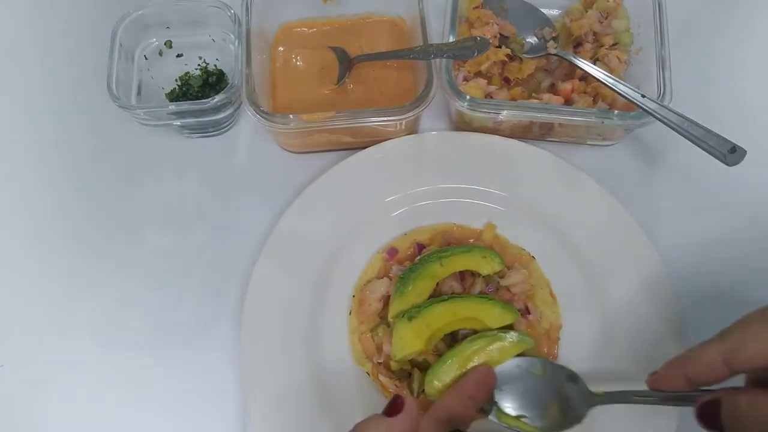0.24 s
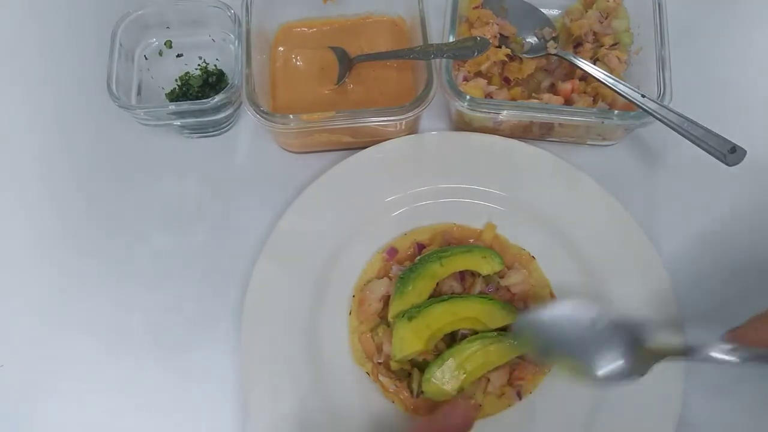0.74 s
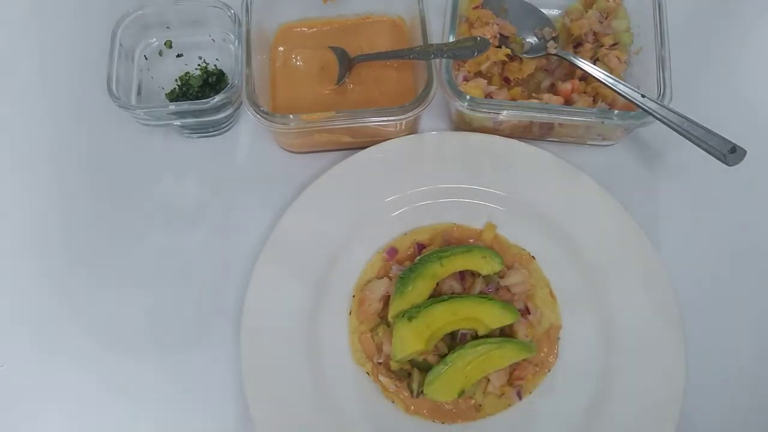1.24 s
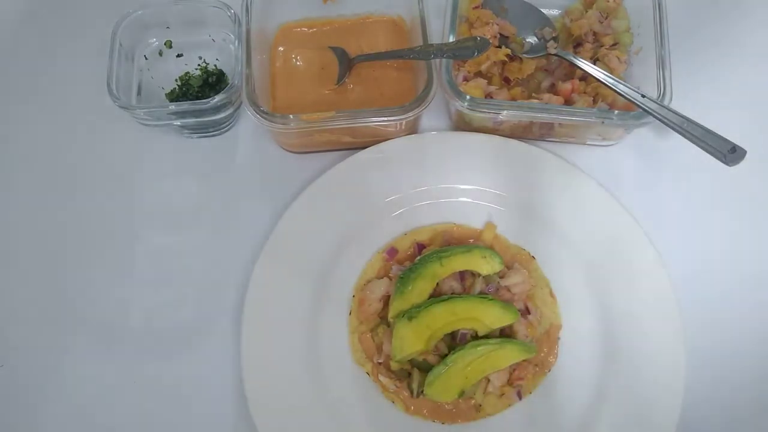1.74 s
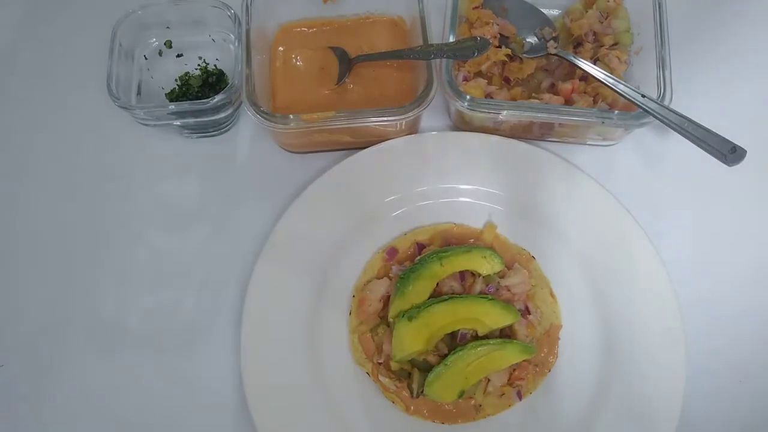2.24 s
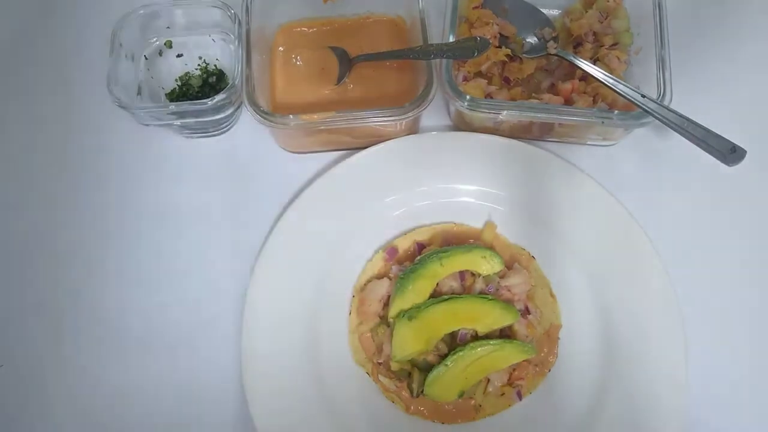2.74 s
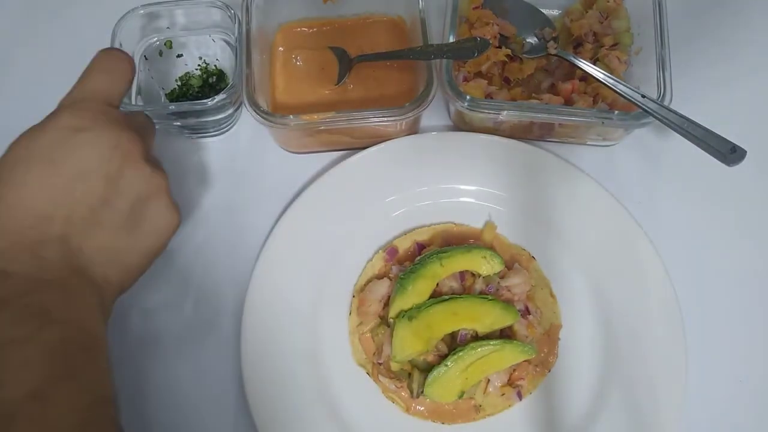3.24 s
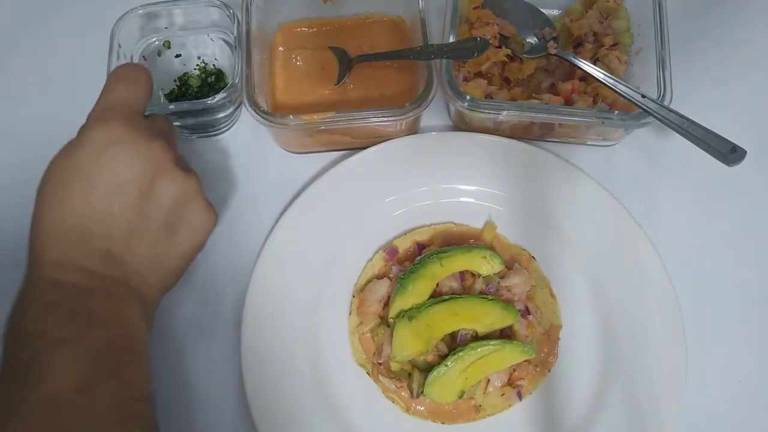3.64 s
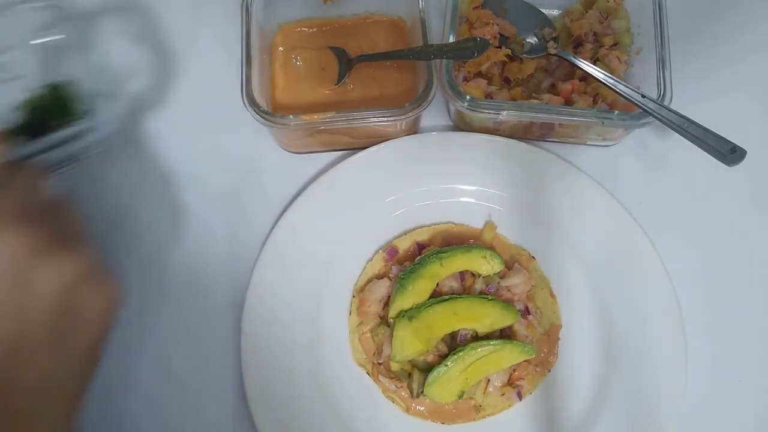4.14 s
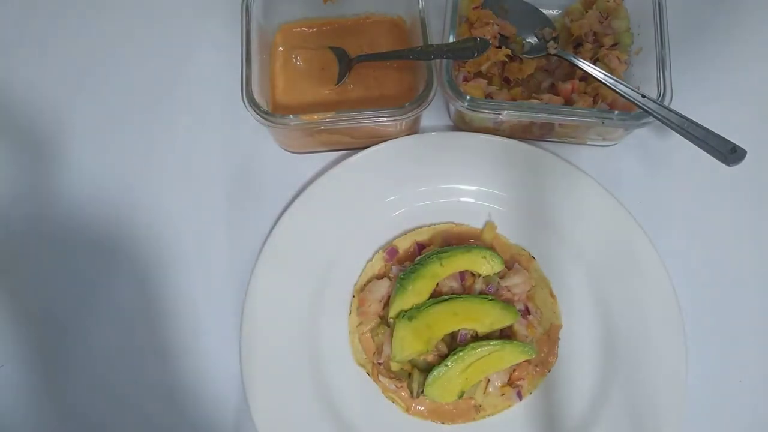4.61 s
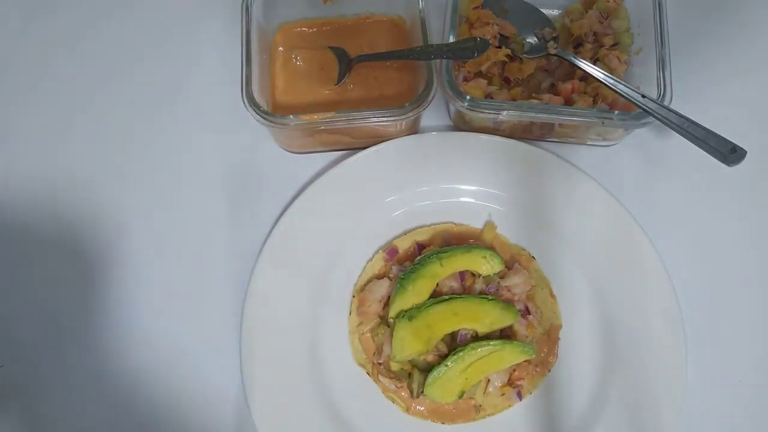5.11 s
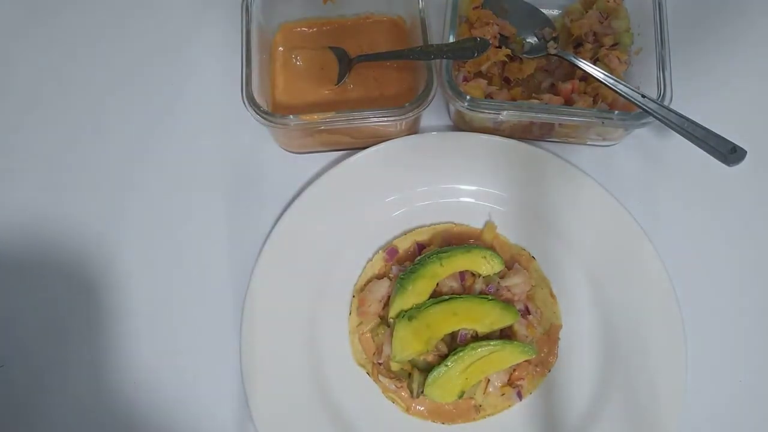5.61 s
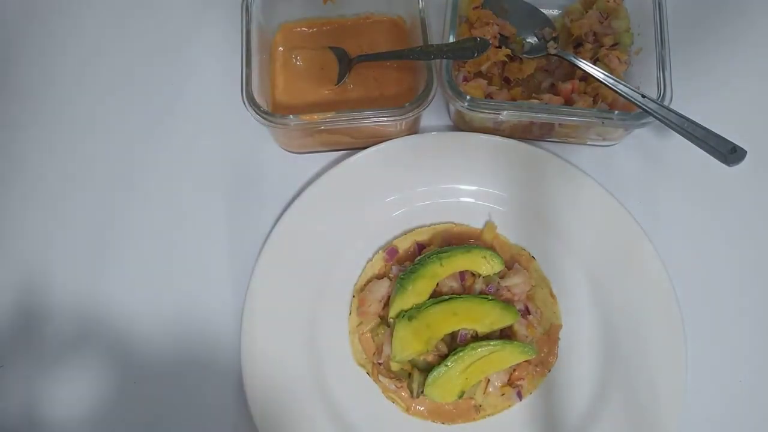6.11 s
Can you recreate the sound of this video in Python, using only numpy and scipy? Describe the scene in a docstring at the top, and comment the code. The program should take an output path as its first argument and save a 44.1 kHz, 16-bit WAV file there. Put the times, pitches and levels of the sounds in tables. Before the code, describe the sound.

A phone close above a kitchen table picks up steady fridge hum and barely audible hand rustle. After a short hoarse squeak, a solid dish bangs down with a clattering knock, rubs along, then knocks even harder. Softer woody bumps follow, then a calm gap, a small glass dish dragging to a stop and one bright, thin clink of a spoon. Short, lively room ring.

```python
"""A quiet kitchen, heard by a phone above the table: a fridge hums, sleeves and fingers rustle, something solid
slides with a short squeak, then knocks hard twice on the worktop, a glass dish drags softly and a spoon clinks.
Hum and rustle are shaped noise and tones; blows are pushes and noise bursts that ring resonances.
The phone steers its two microphones left and right by delaying one and subtracting it from the other.
Levels are set at the microphones, ahead of that steering."""
import sys
import numpy as np
from scipy import signal
from scipy.fft import rfft, irfft, next_fast_len
from scipy.io import wavfile
from scipy.ndimage import map_coordinates

SR = 44100
rng = np.random.default_rng(int(sys.argv[2]) if len(sys.argv) > 2 else 0)


def transcribe(signal):
    """Save signal, clipped to [-1, 1], as a 16-bit WAV file at the path in sys.argv[1]."""
    frames = np.atleast_2d(signal).T
    limited = np.clip(frames, -1, 1)
    pcm = np.round(limited * 32767).astype(np.int16)
    wavfile.write(sys.argv[1], SR, pcm)


N = 280476


def amp(db):
    """dB to gain."""
    return 10 ** (np.asarray(db) / 20)


def unit(x):
    """Scaled to rms 1."""
    return x / np.sqrt(np.mean(x ** 2) + 1e-20)


def along(points, hz):
    """Columns of (Hz, value, ..) points, read along a log frequency axis."""
    f, *columns = np.transpose(points)
    return np.squeeze([np.interp(np.log(hz + 1), np.log(f + 1), values) for values in columns])


def curves(rows):
    """One value per sample for each column after the time."""
    s, *columns = np.transpose(rows)
    return [np.interp(np.arange(N) / SR, s, values) for values in columns]


def wobble(rate):
    """A smooth random curve with rate knots a second."""
    knots = rng.standard_normal(int(N * rate / SR) + 4)
    return map_coordinates(knots, [np.arange(N) * rate / SR])


def filtered(x, response):
    """x passed through a complex response of frequency."""
    n = x.shape[-1]
    m = next_fast_len(n + 8192)
    return irfft(rfft(x, m) * response(np.fft.rfftfreq(m, 1 / SR)), m)[..., :n]


def resonances(modes):
    """Causal sum of (Hz, width Hz, dB) resonances, all starting the same way."""
    return lambda f: sum(amp(db) * 1j * f * width / (hz * hz - f * f + 1j * f * width)
                         for hz, width, db in modes)


SPACING_S = 21.4 / 44100  # sound's travel time between the microphones


def likeness(hz):
    """How alike the two spaced microphones hear sound that comes from all sides."""
    return np.sinc(2 * hz * SPACING_S)


def diffuse(size, gain=np.ones_like):
    """Noise from all sides at the two microphones, rms 1: low frequencies are shared, high ones hardly."""
    mid_side = lambda hz: gain(hz) * np.sqrt([1 + likeness(hz), 1 - likeness(hz)])
    mid, side = filtered(rng.standard_normal((2, size)), mid_side)
    return unit(np.array([mid + side, mid - side]))


# How long the kitchen rings. Each row: frequency in Hz, time to fall 60 dB in seconds.
KITCHEN = [(100, 0.54), (400, 0.43), (1500, 0.65), (4000, 0.62), (12000, 0.19)]


def room(x):
    """A new reverberant tail for one short sound; each frequency dies at its own speed."""
    hz, t, z = signal.stft(diffuse(SR // 2), SR, nperseg=256)
    decay = amp(-60 * t / along(KITCHEN, hz)[:, None])
    tail = signal.istft(z * decay, SR, nperseg=256)[1][:, :SR // 2]
    tail = tail * (1 - np.exp(-np.arange(SR // 2) / SR / 0.00025))
    return signal.fftconvolve(x[None], tail / np.linalg.norm(tail[0]), axes=1)


def placed(x, s, wet_db, lag_ms, pan_db):
    """A short sound at s seconds: direct, later by lag_ms and louder by pan_db at the left, plus the room."""
    wet = amp(wet_db) * room(x)
    delay_s = np.array([[lag_ms / 1000], [0]])
    direct = filtered(np.pad(x, (0, SR // 2 - 1)), lambda hz: np.exp(-2j * np.pi * hz * delay_s))
    both = direct * amp([[pan_db / 2], [-pan_db / 2]]) + wet
    return np.pad(both, ((0, 0), (round(s * SR), N)))[:, :N]


# Room tone of air and fridge together. Each row: time in seconds, level in dB.
ROOM_TONE = [(0.0, -60.5), (2.32, -60.5), (2.62, -56.5), (2.92, -52.5), (3.08, -50.5), (3.4, -56.5),
             (3.58, -54.5), (3.75, -54.5), (4.04, -54.5), (4.64, -56), (5.69, -55), (6.0, -58), (6.36, -55)]
# Colour of the room air. Each row: frequency in Hz, relative density in dB per Hz.
AIR = [(25, -38), (60, -4.5), (110, -22), (200, 2.5), (400, -3.5), (800, -14), (2000, -18.5), (4000, -26),
       (8000, -31), (14000, -34.5)]
# Fuzzy bands of the compressor. Each row: centre in Hz, width in Hz, level in dB over the room tone.
DRONE = [(121.6, 9.7, -6.5), (175.3, 20.6, -4), (247.3, 10.9, -4.5), (375.4, 32, -12.5)]
# Fridge tones. Each row: pitch in Hz, mean level in dB over the opening room tone,
# dB lost against the room tone for each dB that it swells.
WHINE = [(592.4, -12, -0.53), (767, -9.5, 0.4), (1048, -26, 1.5), (2693, -20, 0.3)]


def fridge():
    """Room air, the fuzzy drone of the compressor and a few slightly wavering tones."""
    level_db, = curves(ROOM_TONE)
    t = np.arange(N) / SR
    sound = amp(-2) * diffuse(N, lambda hz: amp(along(AIR, hz)))
    for hz, width, db in DRONE:
        sound += amp(db) * diffuse(N, lambda f: np.exp(-((f - hz) / width) ** 2))
    for hz, db, steady in WHINE:
        gain = amp(db + wobble(3.63) - steady * (level_db - level_db[0]))
        # the tones reach the microphones a quarter turn apart
        phase = 2 * np.pi * hz * t + 0.4 * wobble(4.9) + np.array([[0], [np.pi / 2]])
        sound += gain * np.sin(phase)
    return amp(level_db) * sound


# Hiss of the sleeves. Each row: frequency in Hz, relative density in dB per Hz.
CLOTH = [(1500, -2), (4000, 8.5), (7000, 4), (11000, 5), (14500, -5)]
# Rubbing on the worktop, without the dish's resonances. Each row: frequency in Hz, relative density in dB per Hz.
RUBBING = [(300, -45), (600, 17.5), (1000, 20.5), (2000, 8.5), (3300, 4), (5500, -26), (8000, -51),
           (12000, -61)]
# Resonances of the worktop. Each row: pitch in Hz, width in Hz, relative level in dB.
WORKTOP = [(194.6, 29.5, 7.5), (382.5, 118, 1.5), (471.3, 65, 2), (605, 117, -1), (745, 190, -4),
           (906, 60, 0), (972, 56, 1), (1067, 90, 0), (1212, 63, 0), (1387, 47, 5), (1722, 100, 11),
           (1925, 290, 12)]
# Resonances of the solid dish that knocks. Each row: pitch in Hz, width in Hz, relative level in dB.
DISH = [(944, 46, 0), (1840, 37, 14), (2813, 610, 10), (3326, 44, 9.5), (3670, 110, 10), (5420, 91, 1),
        (6900, 180, -10), (9800, 930, -18), (11900, 510, -20)]
# Separate hand movements. Each row: loudest moment in seconds, swell and fade in seconds (each spans 20 dB),
# cloth level in dB, rubbing level in dB.
STROKES = [(1.7, 0.26, 0.5, -78, -76), (1.98, 0.11, 0.24, -76, -83), (2.13, 0.11, 0.081, -71, -85),
           (2.27, 0.091, 0.12, -74, -75), (2.52, 0.16, 0.058, -66.5, -67.5), (2.69, 0.17, .12, -63, -63),
           (2.78, 0.077, 0.045, -72, -44.5), (2.922, 0.15, 0.15, -45, -43), (3.08, 0.045, 0.22, -59, -39.5),
           (3.69, 0.11, 0.12, -69, -54.5), (3.94, 0.091, 0.062, -73, -60.5), (4.45, 0.6, 0.56, -70.5, -69),
           (4.871, 0.023, 0.22, -67.5, -64), (5.3, 0.2, 0.44, -72, -73), (5.9, 0.093, 0.24, -71.5, -76),
           (6.09, 0.059, 0.21, -60, -66.5)]
SWELL_ROUND, FADE_ROUND = 1.64, 1.48  # 1 = pointed top, 2 = bell-shaped
CHATTER_PER_S, CHATTER_DB = 320, -4.5  # mean taps a second, level over the rubbing
CHATTER_SCATTER_DB = 3.5  # spread of the taps' strength


def rustle():
    """Cloth hisses; skin and dishes rub on the worktop and stir the dish's resonances; both are grainy."""
    s, swell_s, fade_s, cloth_db, rubbing_db = np.transpose(STROKES)[:, :, None]
    t = np.arange(0, N, 64) / SR - s  # one value per 64 samples
    swell = np.abs(t / swell_s) ** SWELL_ROUND
    fade = np.abs(t / fade_s) ** FADE_ROUND
    shape_db = -20 * np.where(t < 0, swell, fade)
    # strokes that overlap add in power
    strength = lambda db: np.repeat(np.linalg.norm(amp(db + shape_db), axis=0), 64)[:N]

    cloth_grain = amp(0.71 * wobble(400) + 1.6 * wobble(60))
    cloth = unit(cloth_grain * diffuse(N, lambda hz: amp(along(CLOTH, hz))))

    colour = lambda hz: amp(along(RUBBING, hz)) + np.abs(resonances(DISH)(hz))
    rubbing_grain = amp(2.3 * wobble(90) + 1.3 * wobble(400))
    rubbing = unit(rubbing_grain * diffuse(N, colour))

    # a sliding dish chatters: tiny soft uneven taps ring worktop and dish
    taps = (rng.random(N) < CHATTER_PER_S / SR) * amp(CHATTER_SCATTER_DB * rng.standard_normal(N))
    bodies = lambda hz: resonances(WORKTOP)(hz) + amp(2.0) * resonances(DISH)(hz)
    chatter = unit(filtered(taps, lambda hz: bodies(hz) / (1 + 1j * hz / 3500) ** 2))
    return strength(cloth_db) * cloth + strength(rubbing_db) * (rubbing + amp(CHATTER_DB) * chatter)


# The short slide. Each row: time in seconds, mean pitch in Hz, mean level in dB.
SQUEAK = [(2.58, 1900, -100), (2.62, 1900, -56), (2.64, 2220, -57), (2.67, 2170, -51), (2.7, 2000, -49.5),
          (2.72, 2000, -100)]


def squeak():
    """Something slides with a short squeak, hoarse because its pitch and level waver fast."""
    hz, level_db = curves(SQUEAK)
    phase = 2 * np.pi * np.cumsum(hz * (1 + 0.074 * wobble(170))) / SR
    # the two microphones hear it nearly in opposite phase
    return amp(level_db + 5.9 * wobble(70)) * np.sin(phase + np.array([[0], [2.6]]))


# Resonances of the small glass dish. Each row: pitch in Hz, width in Hz, level in dB (applied twice over).
GLASS = [(2500, 410, 0), (2900, 260, -1), (5030, 500, -3.5), (9220, 700, -7.5), (11600, 900, -7)]
NUDGE_S, NUDGE_DB = 4.861, -56.5  # start, level ahead of rise and decay
NUDGE_RISE_S, NUDGE_T60 = .003, 0.55  # rise time constant, seconds to fall 60 dB


def nudge():
    """The glass dish drags to a stop: grainy friction stirs its damped resonances."""
    t = np.maximum(np.arange(N) / SR - NUDGE_S, 0)
    grain = amp(2.8 * wobble(150))
    drag = unit(grain * diffuse(N, lambda hz: np.abs(resonances(GLASS)(hz)) ** 2))
    return amp(NUDGE_DB - 60 * t / NUDGE_T60) * (1 - np.exp(-t / NUDGE_RISE_S)) * drag


# Touches of the spoon. Each row: start in seconds, level in dB, loss in dB per octave below 11560 Hz.
CLINK = [(5.1842, -48.5, 2.5), (5.238, -58.5, 14), (5.75, -74, 0)]
# Ringing modes. Each row: pitch in Hz, relative level in dB, time to fall 60 dB in seconds.
SPOON = [(2892, -1, .26), (6022, -7.5, .24), (8300, -1, .02), (8479, -8, .04), (8455, -15, .45),
         (8520, -16, .45), (10330, -20, .035), (10710, -16, .07), (11560, 1, .06), (11575, -11, .2),
         (13730, -4, .012)]


def spoon():
    """Steel touches glass: a noisy tick and a sum of decaying sines."""
    t, sound = np.arange(SR // 2) / SR, np.zeros((2, N))
    for s, db, thin_db in CLINK:
        ring = 0
        for hz, level, t60 in SPOON:
            loss_db = thin_db * max(np.log2(11560 / hz), 0)
            ring = ring + amp(level - loss_db - 60 * t / t60) * np.sin(2 * np.pi * hz * t)
        noise = filtered(rng.standard_normal(len(t)), resonances([(8000, 14000, 0)]))
        tick = 1.9 * amp(-60 * t / 0.0055) * noise
        touch = amp(db) * (ring + amp(-thin_db) * tick)
        sound += placed(touch, s, wet_db=-4.5, lag_ms=0.11, pan_db=-9.0)
    return sound


# Blows on the worktop. Each row: start in seconds, peak of the thud in dB, contact time in ms,
# pitch in Hz that the struck spot favours, crack in dB over the thud, room share in dB.
KNOCKS = [(1.647, -55.5, 0.35, 1030, -23, 2), (2.533, -51.5, 0.78, 1010, -30, 4),
          (2.712, -22, 0.4, 1290, -3, -1), (2.7136, -13, 0.72, 425, -16, -1.2),
          (2.7189, -20.5, 0.4, 920, -8, -0.5), (2.7288, -19, 0.5, 700, -15, -6),
          (2.738, -27.5, 0.54, 900, -3, 0.5), (2.746, -23.5, 0.5, 940, -9, -2),
          (2.7508, -24, 0.64, 1100, -14, -10), (3.0654, -7.5, 0.36, 696, -16.5, -3.5),
          (3.0678, -23, 0.57, 590, -27, 3), (3.074, -29, 0.54, 700, -0.5, -0.5),
          (3.087, -37, 0.57, 1110, 1, -8), (3.096, -34, 0.71, 610, -8, 3), (3.11, -35, 0.28, 1200, -13, -2),
          (3.122, -20.5, 1.05, 498, -36, -6), (3.165, -23, 0.95, 510, -33, -15),
          (3.175, -35, 1.1, 447, -22, 4), (3.533, -41, 1.07, 585, -25, 0), (3.539, -40, 0.75, 600, -35, -3),
          (3.583, -33.5, 1.04, 560, -25, -6), (3.586, -38, 0.93, 895, -30, -4),
          (3.651, -27.5, 0.65, 470, -37, -1), (3.6529, -34, 0.64, 590, -33, -9),
          (3.686, -30.5, 0.78, 560, -26, -5), (3.709, -34, 0.24, 500, -30, -5),
          (3.728, -29, 0.55, 480, -23, 0), (3.734, -33, 0.63, 400, -33, -5),
          (3.908, -34.5, 0.58, 440, -35, -1.5), (3.918, -44, 0.91, 600, -30, 4.5),
          (4.864, -40, 1.23, 380, -27, 4), (4.878, -46, 1.05, 380, -22, 0),
          (5.889, -61, 0.18, 1490, 6.5, -3.5), (6.085, -60.5, .3, 1490, 8.5, 2.5)]
SNAP_DB, SNAP_S, SNAP_GROWS = -36, .0016, 2  # hard edge of a 0.5 ms contact, its t60, power of 1 / contact time


def knocks():
    """Each blow is a smooth push that rings the worktop (short contact is brighter) and a crack that rings the dish."""
    t, sound = np.arange(SR // 8) / SR, np.zeros((2, N))
    for s, db, contact_ms, spot_hz, crack_db, wet_db in KNOCKS:
        # the push peaks at u = 3, that is 0.6 of the contact time
        u = 5 * t / (max(contact_ms, .05) / 1000)
        push = u * u * u * np.exp(-u)
        # modes far from the favoured pitch are struck near their still points
        modes = [(hz, width, level - 8.5 * abs(np.log2(hz / spot_hz)) + rng.normal(0, 1))
                 for hz, width, level in WORKTOP]
        thud = filtered(push, resonances(modes))
        # the longer the contact, the more slowly the ringing builds
        thud = thud * (1 - np.exp(-u / 9))
        # the thud carries no deep bass
        thud = filtered(thud, lambda hz: (1j * hz / (130 + 1j * hz)) ** 2)

        edge = amp(-60 * t / 0.021) * rng.standard_normal(len(t))
        click = amp(-60 * t / SNAP_S) * rng.standard_normal(len(t))
        crack = amp(crack_db) * (filtered(edge, resonances(DISH)) + 0.006 * edge)
        sharpness = (.5 / max(contact_ms, .2)) ** SNAP_GROWS
        snap = amp(SNAP_DB) * sharpness * np.diff(click, prepend=0)
        blow = amp(db) * (crack + snap - thud / np.abs(thud).max())
        sound += placed(blow, s, wet_db, lag_ms=0.11, pan_db=-2.6)
    return sound


def scene():
    """Everything that reaches the two microphones."""
    return fridge() + rustle() + squeak() + nudge() + knocks() + spoon()


# Steering. Each row: frequency in Hz, share of the right microphone that the left channel loses,
# share of the left microphone that the right channel loses.
STEER = [(298, 1, 0.91), (2160, 1, 0.69), (5100, 0.52, 0.26), (9000, 0.17, 0.2), (14000, 0.23, 0.11)]
TOP_HZ = 14270  # nothing steered passes above this


def record(dry):
    """Each channel loses a delayed share of the other microphone; an equaliser restores the bass that this cancels."""
    share = lambda hz: np.clip(along(STEER, hz), 0, .98)
    bass_cut = lambda hz: (1j * hz / 70) / (1 + 1j * hz / 70)

    def even(hz):
        """Undoes, below TOP_HZ, the colour that the subtraction gives to sound from all sides; cuts deep bass."""
        common = 2 * share(hz) * likeness(hz) * np.cos(2 * np.pi * hz * SPACING_S)
        return (hz < TOP_HZ) * bass_cut(hz) / np.sqrt(1 + share(hz) ** 2 - common)

    other = filtered(dry[::-1], lambda hz: share(hz) * np.exp(-2j * np.pi * hz * SPACING_S))
    # each microphone adds a faint low rumble of its own, which the steering cannot cancel
    rumble = filtered(rng.standard_normal((2, N)), lambda hz: np.exp(-((hz - 60) / 22) ** 2))
    return filtered(dry - other, even) + amp(-80.5) * unit(rumble)


dry = scene()
out = record(dry)
transcribe(out)
```